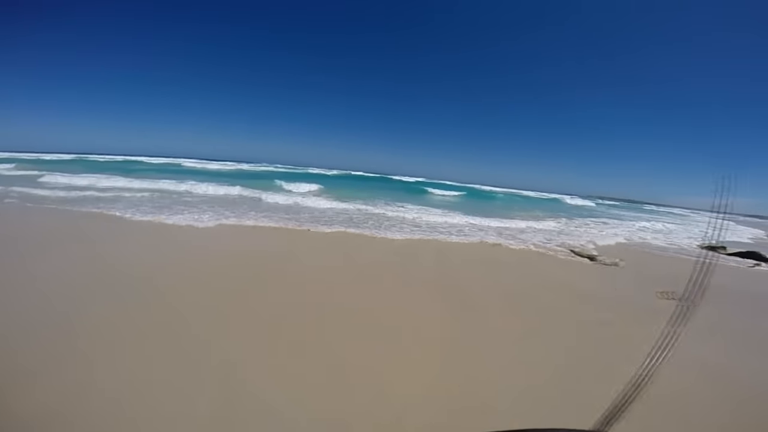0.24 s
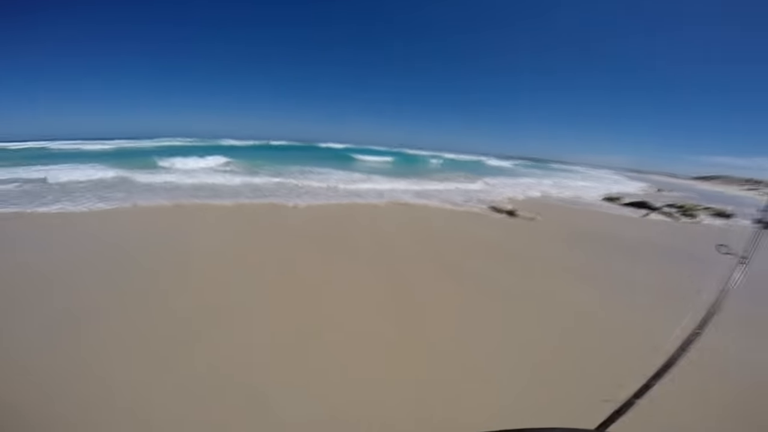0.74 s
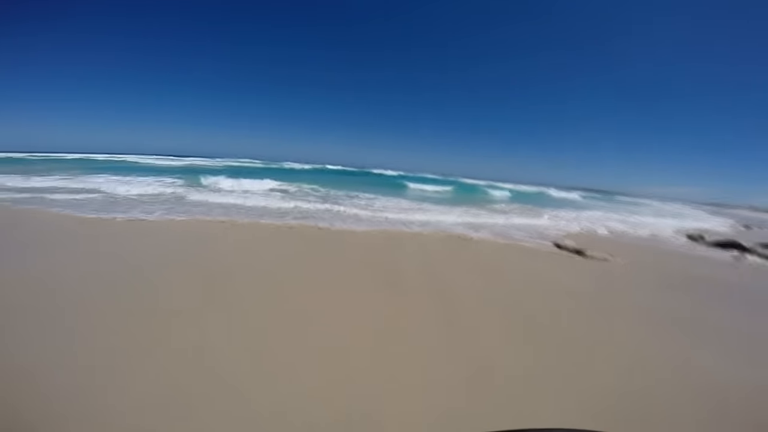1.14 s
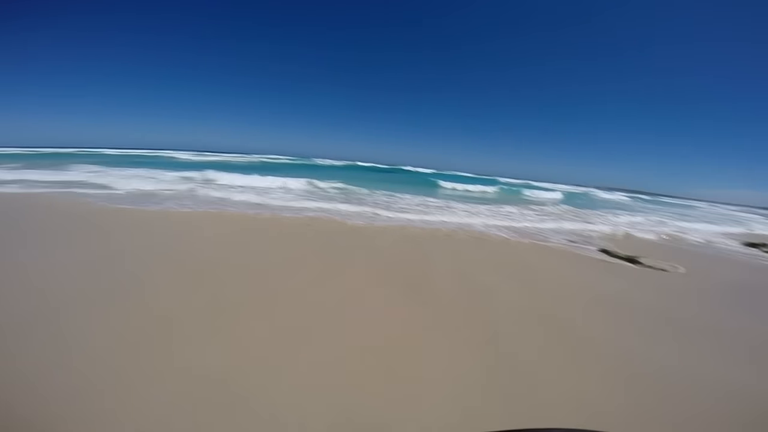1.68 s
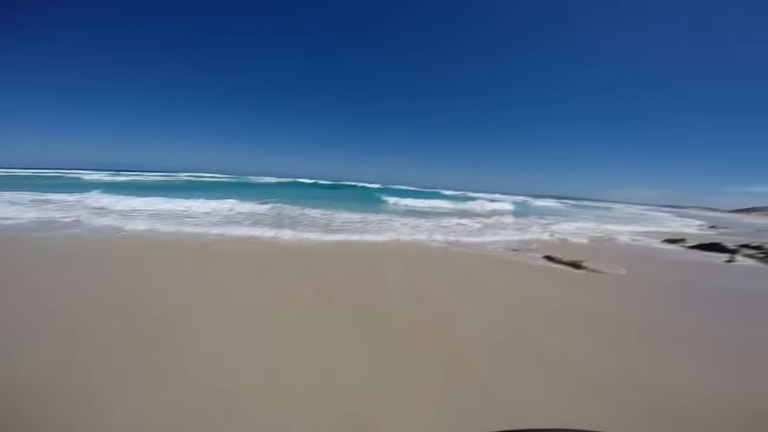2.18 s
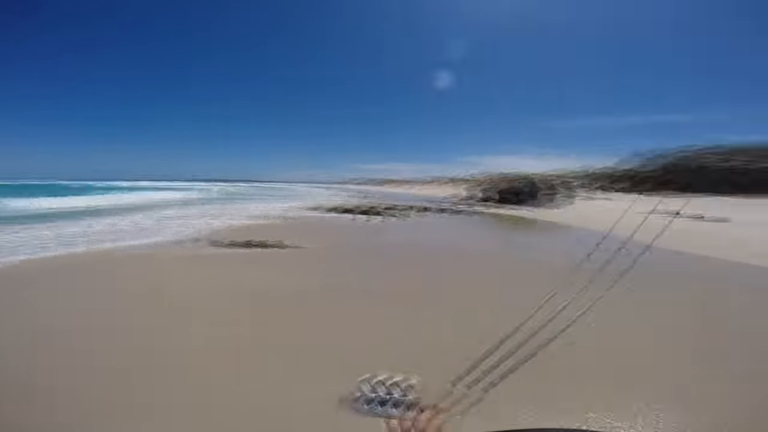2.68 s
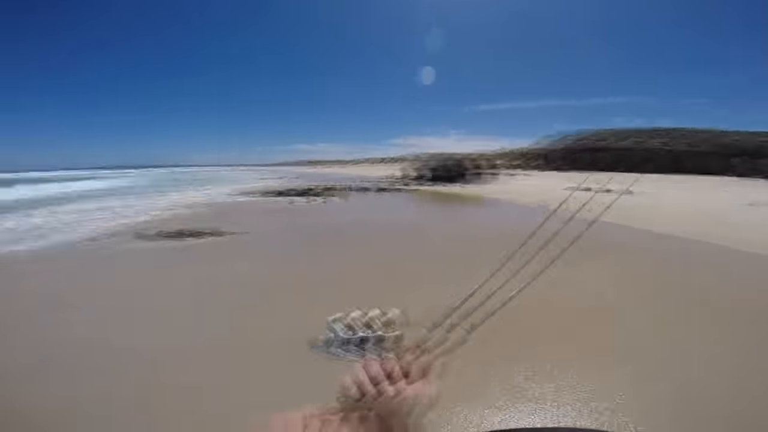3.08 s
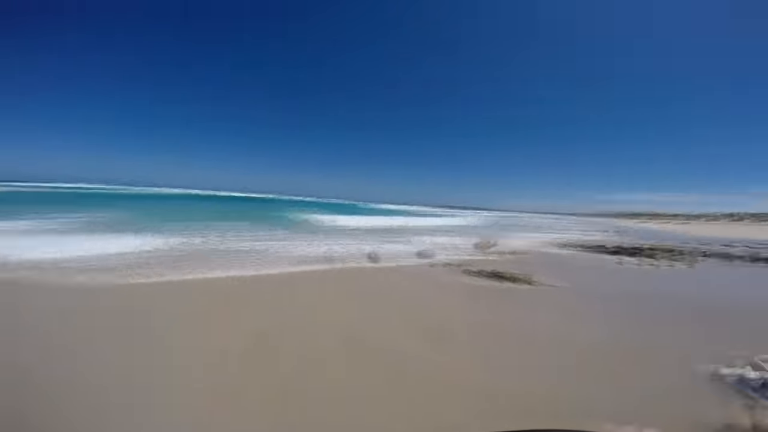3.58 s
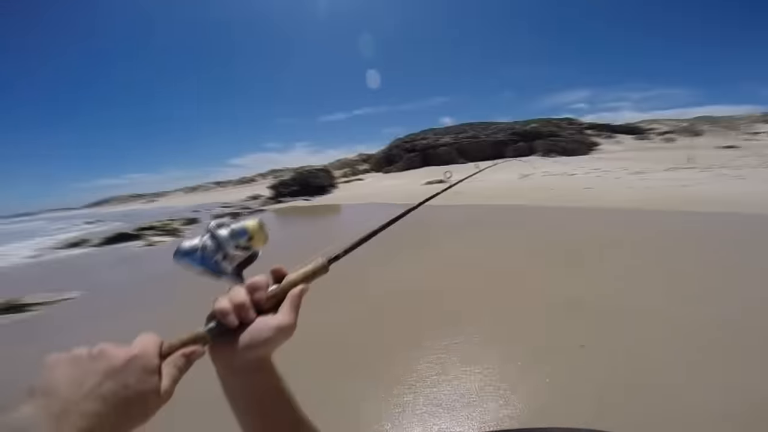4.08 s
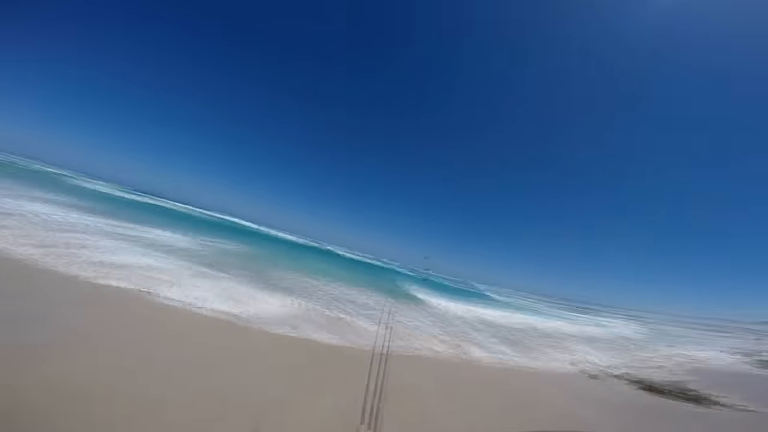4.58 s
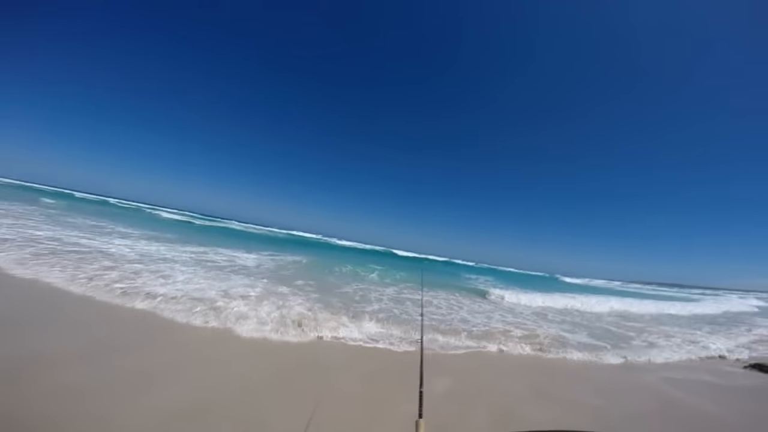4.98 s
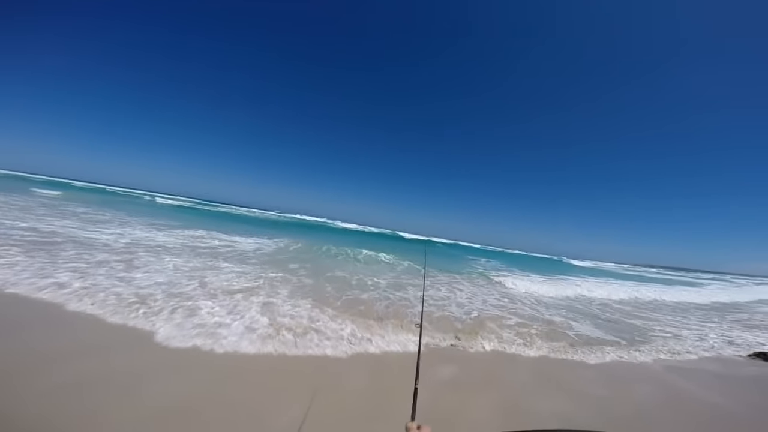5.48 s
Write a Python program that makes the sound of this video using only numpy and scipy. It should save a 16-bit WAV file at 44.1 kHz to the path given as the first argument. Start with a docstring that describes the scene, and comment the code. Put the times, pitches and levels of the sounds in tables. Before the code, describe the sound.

An angler walks over wet sand toward the waves, each step reaching the body-worn microphone as a muffled, deep thud over a constant, slightly boxy wash of surf. The steps grow lighter, then the swing of a rod shakes the microphone mount, which knocks, rasps and rattles briefly as air buffets it. One soft step and the hissing sea follow.

```python
"""Surf cast from a body-worn camera

An angler walks over wet sand to the surf and casts. Each footfall reaches the camera through the
body as a deep thud. The cast jolts the mount, which knocks, scrapes and clicks while air buffets
the plastic case. The surf hisses on, coloured by the case's resonances."""
import sys
import numpy as np
from scipy import signal
from scipy.fft import rfft, irfft, next_fast_len
from scipy.io import wavfile
from scipy.ndimage import uniform_filter1d

SR = 44100
rng = np.random.default_rng(int(sys.argv[2]) if len(sys.argv) > 2 else 0)


def dump_mix(stems):
    """Bounce the given channels to the path in sys.argv[1] as a 16-bit WAV at rate SR."""
    frames = np.atleast_2d(stems).T  # one column per channel
    limited = np.clip(frames, -1, 1)  # hard clip at full scale
    pcm = np.round(limited * 32767).astype(np.int16)
    wavfile.write(sys.argv[1], SR, pcm)


N = 252604
T = np.arange(N) / SR
LEAD_S = 0.1  # start of a thud to the centre of its push


def footsteps(toe_lag_s=0.0786, toe_ms=6.1, slap_decay_s=0.0029):
    """Deep thuds, heel then forefoot; a hard heel also knocks the mount and slaps the wet sand."""
    # footfalls: t/s, heel peak/dB, sway f/Hz, sway width/Hz, heel hardness/dB
    steps = [(0.134, -15, 31.5, 10.5, -9), (0.666, -20, 29, 13, -14), (1.039, -28, 28, 53, -6),
             (1.189, -3, 28, 15.7, -0.5), (1.697, -5.5, 29.2, 12.2, -19), (2.171, -2.5, 27.6, 23, -3),
             (2.647, -22, 23.7, 14, -12), (3.136, -12.5, 35.2, 11, -14), (3.683, -23, 27, 28, -6),
             (5.333, -25, 23.2, 5, -16)]
    out, t = np.zeros(N), T[:SR // 5]
    sand_lowpass = signal.butter(3, 1500, fs=SR, output="sos")  # wet sand swallows treble
    for s, db, hz, width_hz, hard_db in steps:
        heel_ms = 1000 * (0.16 - 0.0033 * db) / hz  # lighter steps land more slowly
        add(out, s - LEAD_S, thud(heel_ms, hz, width_hz, db))
        add(out, s + toe_lag_s - LEAD_S, thud(toe_ms, hz, width_hz, 0.21 * db - 27))
        add(out, s, knock(db - 24 + hard_db))
        grains = rng.standard_normal(len(t)) * np.exp(-t / slap_decay_s)
        slap = signal.sosfilt(sand_lowpass, resonate(grains, hz=750, width_hz=2000))
        add(out, s, peak(slap, db - 29 + 3 * hard_db))
    return out


def jolts(sway_lag_s=0.0052):
    """The rod's swing knocks the camera against its mount; it sways after."""
    # jolts of the mount: t/s, sway peak/dB, contact/ms, knock peak/dB
    hits = [(4.352, -25, 7.6, -62), (4.392, -14.5, 11, -65), (4.479, -16, 11, -31),
            (4.514, -8.5, 10.4, -16), (4.553, -9.5, 3.7, -27), (4.572, -15, 6, -19.5),
            (4.616, -3.5, 6.2, -15.5), (4.669, -20, 17, -30), (4.69, -10, 7.8, -32), (4.832, -23, 9.4, -63)]
    out = np.zeros(N)
    for s, sway_db, contact_ms, knock_db in hits:
        sway = thud(contact_ms, sway_hz=20, width_hz=20, db=sway_db, leak_hz=8.8)
        add(out, s + sway_lag_s - LEAD_S, sway)
        add(out, s - 0.001, knock(knock_db))
    return out


def thud(contact_ms, sway_hz, width_hz, db, leak_hz=12, roundness=6.4):
    """A soft push sets the camera swaying; the slowest part leaks away."""
    t_ms = (T[:SR // 2] - LEAD_S) * 1000
    push = (1 + (t_ms / contact_ms) ** 2 / roundness) ** -roundness
    sway = resonate(push, sway_hz, width_hz, high=True)
    return peak(resonate(sway, leak_hz, np.sqrt(2) * leak_hz, high=True), db)


def knock(db, lowpass_hz=370, bump_s=0.00246):
    """A padded bump rings the mount's modes."""
    # modes of the mount: f/Hz, t60/s, relative level/dB
    modes = [(116, 0.051, 10), (160, 0.048, -2), (227, 0.083, -7.5), (254, 0.075, -3.5), (334, .03, -37)]
    t = T[:SR // 5]
    ring = sum(undb(mode_db - 60 * t / t60_s) * np.cos(2 * np.pi * hz * t)
               for hz, t60_s, mode_db in modes)
    ring = signal.sosfilt(signal.butter(5, lowpass_hz, fs=SR, output="sos"), ring)
    bump = np.sin(np.pi * np.minimum(t / bump_s, 1)) ** 4
    return peak(peak(ring, 0) + 0.33 * bump, db)


def scrape(slips_per_s=2200):
    """Dense uneven slips of the mount ring the plastic, over a smoother rub."""
    # rub spectrum: f/Hz, relative level/dB
    spectrum = [(400, -26.5), (600, -8), (800, -14), (1400, -4), (2000, -0.5), (3100, -9.5), (3500, -16.5),
                (4200, -24), (5800, -17.5), (8400, -45), (10000, -25.5), (11500, -43), (14000, -47)]
    # resonances of the plastic: f/Hz, width/Hz, lift/dB
    resonances = [(1110, 180, 7), (1590, 96, 2), (1850, 250, 6.5), (2350, 38, 7.5), (2637, 180, 12),
                  (2730, 43, 0), (3083, 120, 10)]
    # rasps as the mount gives way: t/s, level/dB
    rasps = [(4.535, -33.5), (4.552, -34), (4.597, -25)]
    slips = (rng.random(N) < slips_per_s / SR) * rng.choice([-1, 1], N)
    slips = slips * undb(2 * rng.standard_normal(N))
    rub = 0.11 * rng.standard_normal(N)
    force = surge(s=4.53, db=-40, rise_db_per_s=118, fall_db_per_s=118)  # strain of the swing
    for s, db in rasps:
        force = np.hypot(force, surge(s, db, rise_db_per_s=680, fall_db_per_s=1100))
    return colour(slips + rub, spectrum, resonances) * force


def clicks(decay_s=0.0024):
    """Short rattles of hard plastic, each about an octave wide."""
    # tackle clicks: t/s, peak/dB, f/Hz
    rattles = [(3.632, -41, 6000), (4.479, -35.5, 5670), (4.524, -33, 5670), (4.529, -29, 2100),
               (4.551, -26, 2290), (4.567, -28.5, 1410), (4.695, -28.5, 2220), (4.707, -28.5, 2100),
               (5.11, -35, 1950)]
    out, t = np.zeros(N), T[:SR // 20]
    for s, db, hz in rattles:
        burst = rng.standard_normal(len(t)) * np.exp(-t / decay_s)
        band = signal.butter(3, [0.65 * hz, 1.35 * hz], "band", fs=SR, output="sos")
        add(out, s, peak(signal.sosfilt(band, burst), db))
    return out


def buffet(breeze_db=-43, gust_db=2):
    """Slow eddies on the case: a breeze, plus the rush of the swing."""
    # eddy spectrum: f/Hz, relative level/dB
    spectrum = [(12, 0), (24, -7.5), (42, -7.5), (62, -19), (100, -29), (200, -34.5), (500, -58)]
    swing = surge(s=4.58, db=-20.5, rise_db_per_s=60, fall_db_per_s=45)
    airflow = np.hypot(undb(breeze_db), swing)
    return colour(rng.standard_normal(N), spectrum) * airflow * undb(gust_db * wander(12))


def surf(churn_db=0.78, shade_db=-3.5, bubbles_per_s=2500):
    """Breakers roar, wash churns the sand, foam bursts in tiny bubbles; turning aside dulls it."""
    # spectra of breakers, wash and foam: f/Hz, relative level/dB
    roar_spectrum = [(50, -2.5), (130, -1.5), (280, -3), (480, -7), (800, -12), (1200, -24.5), (2500, -72)]
    wash_spectrum = [(500, -12), (950, -1.5), (1500, 1), (2100, -2), (2800, -6), (3700, -6.5),
                     (5000, -19.5), (9000, -25.5)]
    foam_spectrum = [(2500, -16), (4300, -3), (5200, -4.5), (5800, -9), (7200, -12.5), (7900, -16),
                     (10500, -17.5), (11500, -21), (15000, -27)]
    # air resonances of the case: f/Hz, width/Hz, lift/dB
    case = [(1628, 303, 5.5), (2584, 576, 6), (3100, 190, 4), (3584, 293, 5.5), (6220, 136, 6.5),
            (6920, 950, 7.5), (10300, 760, 2)]
    # case hollows rung by the wash, most when side-on: f/Hz, width/Hz, relative level/dB
    hollows = [(1644, 410, -0.5), (2510, 550, -8)]
    # slow swell of the sea: t/s, wash base level/dB, foam base level/dB
    swell = [(0, -52, -57), (1.6, -52.5, -58), (3.4, -51, -53.5), (4.2, -51, -58), (4.95, -50.5, -54.5),
             (5.45, -53.5, -55), (5.73, -54.5, -57.5)]
    # body turns away from the sea: centre t/s, half length/s, angle/quarter turns
    turns = [(.92, .25, 0.67), (3.134, 0.42, 1.13), (4.095, 0.37, 0.83)]
    wash_db, foam_db = curves(swell)
    aside = sum(angle * np.exp(-((T - s) / half_s) ** 2) for s, half_s, angle in turns)
    foam_db = foam_db + shade_db * aside
    hollow_db = wash_db - 9 + 8.6 * aside
    roar_db = -52.5 + 0.74 * (wash_db - wash_db.mean())
    pops = (rng.random(N) < bubbles_per_s / SR) * rng.standard_normal(N)
    bubbles = unit(pops * undb(3 * rng.standard_normal(N)))
    roar = colour(rng.standard_normal(N), roar_spectrum) * undb(roar_db + 0.5 * wander(7.5))
    wash = colour(rng.standard_normal(N), wash_spectrum, case)
    wash *= undb(wash_db + churn_db * wander(22.34))
    foam = colour(rng.standard_normal(N) + 0.2 * bubbles, foam_spectrum, case)
    foam *= undb(foam_db - 1.54 + 0.44 * wander(10))
    ring = unit(sum(undb(db) * hiss(hz, width_hz) for hz, width_hz, db in hollows))
    ring *= undb(hollow_db + churn_db * wander(22.25))
    # facing the foam lets in a direct hiss, which swells faster than the rest
    direct = hiss(hz=4900, width_hz=1100) * undb(-68 + 2 * (foam_db - foam_db.mean()))
    return roar + wash + foam + ring + direct


def sheen(slope_db_per_s=37):
    """A thin high hiss comes and goes over the surf."""
    # swells of the hiss: t/s, level/dB
    swells = [(.03, -63), (2.5, -65), (3.6, -61.5)]
    gain = sum(surge(s, db, slope_db_per_s, slope_db_per_s) for s, db in swells)
    return hiss(hz=6440, width_hz=940) * gain


def undb(db):
    """Decibels to gain."""
    return 10 ** (np.asarray(db) / 20)


def unit(x):
    """Scale to rms 1."""
    return x / np.sqrt(np.mean(x ** 2))


def peak(x, db):
    """Scale to a peak level."""
    return x * undb(db) / np.max(np.abs(x))


def add(out, s, x):
    """Mix x in at time s."""
    i = int(s * SR)
    out[i:i + len(x)] += x[:N - i]


def curves(rows):
    """Table columns, interpolated linearly in time."""
    s, *columns = np.transpose(rows)
    return [np.interp(T, s, column) for column in columns]


def surge(s, db, rise_db_per_s, fall_db_per_s):
    """Gain that peaks at time s and dies away."""
    return undb(db - np.maximum((s - T) * rise_db_per_s, (T - s) * fall_db_per_s))


def wander(rate_hz):
    """Smooth random drift; rms 1."""
    hold = int(SR / rate_hz)
    held = rng.standard_normal(1024)[np.arange(N) // hold % 1024]
    return unit(uniform_filter1d(uniform_filter1d(held, hold), hold))


def colour(x, spectrum, resonances=()):
    """Shape by a spectrum and bell-shaped resonances; rms 1."""
    size = next_fast_len(N)
    f = np.arange(size // 2 + 1) * SR / size
    hz, db = np.transpose(spectrum)
    gain_db = np.interp(np.log(f + 1), np.log(hz), db)
    for centre_hz, width_hz, lift_db in resonances:
        gain_db += lift_db / (1 + (2 * (f - centre_hz) / width_hz) ** 4)
    skirts = np.minimum(f / hz[0], 1) ** 2 / np.maximum(f / hz[-1], 1) ** 2
    return unit(irfft(rfft(x, size) * undb(gain_db) * skirts, size)[:N])


def resonate(x, hz, width_hz, high=False):
    """Two-pole band-pass, or resonant high-pass."""
    w = 2 * np.pi * min(hz, SR / 3) / SR
    damping = np.sin(w) * width_hz / hz / 2
    numerator = [1, -2, 1] if high else [damping, 0, -damping]
    return signal.lfilter(numerator, [1 + damping, -2 * np.cos(w), 1 - damping], x)


def hiss(hz, width_hz):
    """Noise in one steep resonance; rms 1."""
    band = resonate(rng.standard_normal(N), hz, width_hz)
    return unit(resonate(band, hz, width_hz))


def scene():
    """Surf, walk and cast; mono."""
    return (surf() + buffet() + footsteps() + jolts() + scrape() + clicks() + sheen())[None]


def record(dry, cutoff_hz=15300):
    """The camera's steep low-pass."""
    return signal.sosfilt(signal.ellip(10, 0.2, 80, cutoff_hz, fs=SR, output="sos"), dry)


dry = scene()
out = record(dry)
dump_mix(out)
```